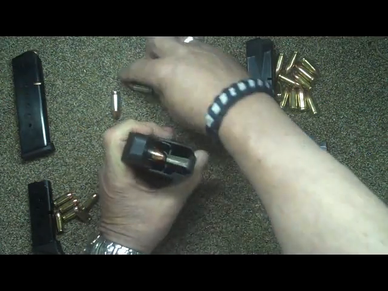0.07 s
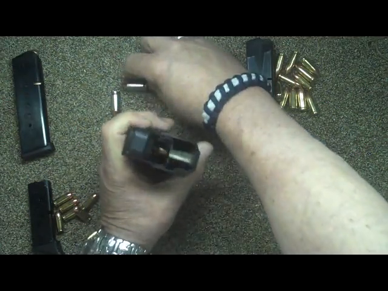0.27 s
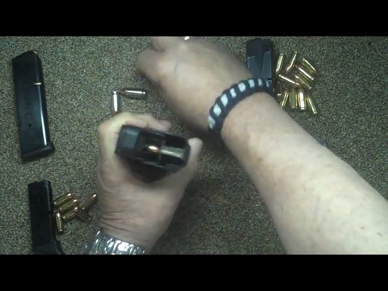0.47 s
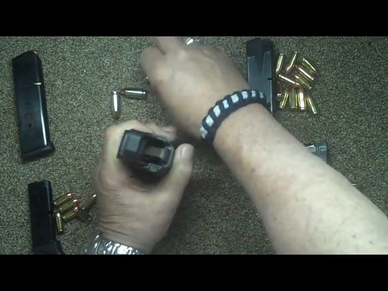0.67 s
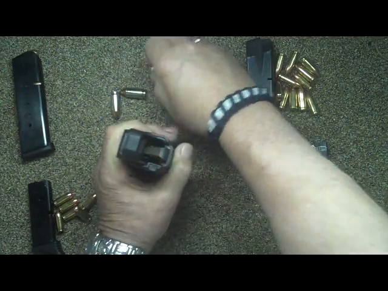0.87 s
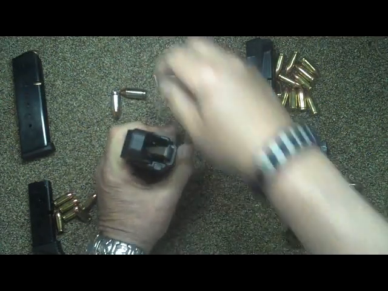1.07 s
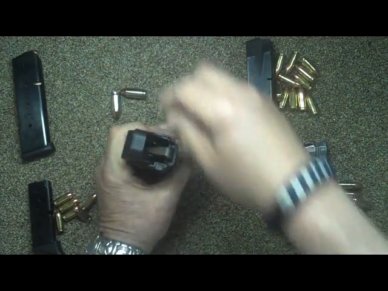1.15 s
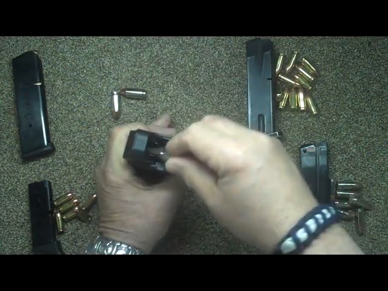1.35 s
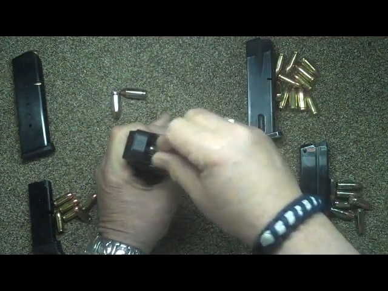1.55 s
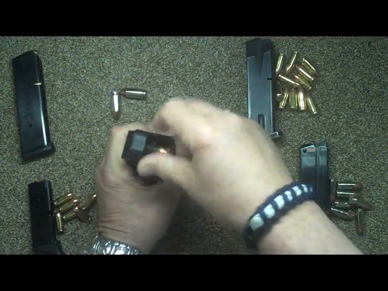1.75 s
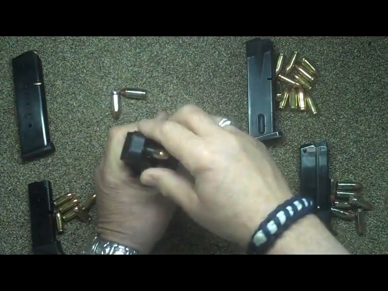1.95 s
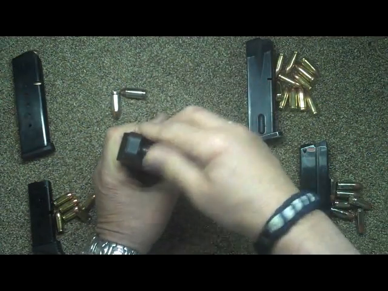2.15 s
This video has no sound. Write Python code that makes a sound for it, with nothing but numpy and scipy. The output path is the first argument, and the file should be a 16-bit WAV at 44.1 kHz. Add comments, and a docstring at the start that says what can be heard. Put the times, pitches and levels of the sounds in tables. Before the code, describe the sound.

Cartridges pressed into a steel magazine with bright snaps and short metallic ring; a plastic loader scrapes and rattles midway, another cluster of snaps follows, then faint handling over quiet background hiss in a small room.

```python
"""Loading a pistol magazine

A plastic loader snaps down, a cartridge slides home and the loader rasps back up the magazine.
The next cartridge clatters against the steel lips and is pressed in with two snaps.
Clicks are noise bursts with a modal steel ring; slide and drag are random slips over hiss.
Knocked parts are damped sine clusters and finger brushes are swelling hiss.
A small room, a thin microphone sound and quiet background noise surround it all."""
import sys
import numpy as np
from scipy import signal
from scipy.fft import rfft, irfft
from scipy.io import wavfile
from scipy.ndimage import uniform_filter1d

SR = 44100
rng = np.random.default_rng(int(sys.argv[2]) if len(sys.argv) > 2 else 0)


def bounce(signal):
    """Save signal as a 16-bit WAV file at the path given by the first command-line argument."""
    frames = np.transpose(np.atleast_2d(signal))
    limited = np.clip(frames, -1, 1)
    pcm = np.round(limited * 32767).astype(np.int16)
    wavfile.write(sys.argv[1], SR, pcm)


N = 97020  # length in samples, 2.2 s


def amp(db):
    """Decibels to gain."""
    return 10 ** (np.asarray(db) / 20)


def unit(x):
    """Scales to an rms of one."""
    return x / np.sqrt(np.mean(x ** 2) + 1e-20)


def add(mix, s, sound):
    """Mixes a sound in, starting at s seconds."""
    part = mix[max(0, round(s * SR)):][:len(sound)]
    part += sound[:len(part)]


def read(points, hz):
    """Reads a curve of (Hz, value) points on a log-frequency axis."""
    f, value = np.transpose(points)
    return np.interp(np.log(hz + 1), np.log(f + 1), value)


def colour(x, points, size=2048):
    """Causal minimum-phase filter with the given spectrum in dB."""
    hz = abs(np.fft.fftfreq(size, 1 / SR))
    log_gain = np.log(amp(read(points, hz)))
    spectrum = np.exp(np.conj(signal.hilbert(log_gain)))
    taps = np.fft.ifft(spectrum).real
    return signal.fftconvolve(x, taps)[:len(x)]


def fade(t, t60):
    """Exponential decay that falls by 60 dB in t60 seconds."""
    return np.exp(-np.log(1000) * t / t60)


def level(curve, axis=1):
    """Gain at every sample from one dB column of a curve."""
    columns = np.transpose(curve)
    return amp(np.interp(np.arange(N) / SR, columns[0], columns[axis]))


def dense(n):
    """Noise with an even spectrum: countless overlapping modes in random phase."""
    phase = 2 * np.pi * rng.random(n // 2 + 1)
    return unit(irfft(np.exp(1j * phase), n))


def uneven(n, depth_db, s):
    """A random gain that glides to a new value every s seconds."""
    knots = np.clip(rng.standard_normal(N // 4), -2, 2)
    wander = np.interp(np.arange(n) / SR / s, np.arange(len(knots)), knots)
    return unit(amp(depth_db * wander))


def balanced(x, order=140):
    """Evens out the broad tilt and humps of a noise burst and keeps its fine resonances."""
    power = uniform_filter1d(abs(rfft(x)) ** 2, order)
    inverse_db = -10 * np.log10(power + 1e-12)
    return colour(x, np.c_[np.fft.rfftfreq(len(x), 1 / SR), inverse_db])


def friction(slips_per_s, spread_db, hiss_db):
    """Tiny random slips of uneven size over a smooth hiss."""
    happens = rng.random(N) < slips_per_s / SR
    size = amp(spread_db * np.minimum(rng.exponential(1, N), 3))
    slips = happens * rng.choice([-1, 1], N) * size
    return unit(slips) + amp(hiss_db) * dense(N)


# Ring of the steel magazine. Each row: mode in Hz, relative level in dB, 60 dB decay in seconds.
MAGAZINE_MODES = [(1373, -5.5, 0.029), (1617, -6, 0.057), (1885, -4, 0.061), (2077, 0.5, 0.044),
                  (2125, -5, 0.029), (2450, -12.5, 0.053), (2792, -20, 0.053), (2987, -7, 0.024),
                  (3138, -5, 0.047), (3634, -8.5, 0.022), (6404, -7, 0.049), (6920, -6, 0.033)]


def magazine(t):
    """The steel rings as a sum of decaying modes after one blow."""
    ring = np.zeros(len(t))
    for hz, db, t60 in MAGAZINE_MODES:
        ring += amp(db) * fade(t, t60) * np.sin(2 * np.pi * (hz * t + rng.random()))
    return ring


def rubbed_magazine(rub):
    """Every slip of the rubbing sets the magazine's modes ringing."""
    return unit(signal.fftconvolve(rub, magazine(np.arange(SR // 4) / SR))[:N])


# Cartridge sliding on steel. Each row: time in seconds, level in dB before body and room.
SLIDE_LEVEL = [(0, -55), (.11, -61), (.15, -65), (.225, -57.5), (.26, -41.5), (.35, -60.5), (.42, -64),
               (.60, -60.5), (.62, -49.5), (.688, -51.5), (.73, -70), (1.42, -66.5), (1.435, -55.5),
               (1.505, -49), (1.59, -67), (1.635, -45.5), (1.655, -71), (1.68, -48), (1.80, -66),
               (2.2, -71)]
# Tone of brass on steel. Each row: frequency in Hz, relative level in dB.
SLIDE_COLOUR = [(100, -29), (600, -16), (1300, -13), (2000, 2), (3000, -2.5), (4200, -8), (6800, -7),
                (8500, -14.5), (10000, -14), (12000, -32.5), (14000, -78)]


def slide():
    """Brass rubs along the steel in small slips and sets the magazine ringing faintly."""
    rub = friction(slips_per_s=1800, spread_db=3.5, hiss_db=1.0)
    scrape = unit(colour(rub, SLIDE_COLOUR))
    return level(SLIDE_LEVEL) * unit(scrape + amp(-31.0) * rubbed_magazine(rub))


# Snaps and clicks of loader, cartridge and magazine. Each row: start in seconds, bass, middle, treble
# and top in relative dB, rise in seconds, 60 dB decay of the crack in seconds, magazine ring in relative dB.
CLICKS = [ (0.0724, -50.5, -42, -48.5, -88, 0.0014, 0.053, -7),
          (0.1877, -58, -41.5, -56, -81, 0.0036, 0.048, 1.5),
          (0.2339, -82, -50.5, -36.5, -42.5, 0.00031, 0.03, 1.5),
          (0.2623, -52.5, -25.5, -24.5, -28.5, 0.0023, 0.02, -1),
          (.2690, -45, -29.5, -30, -41.5, 0.00055, 0.036, 1.5),
          (.2800, -71, -29, -55, -65, 0.00059, 0.052, -8),
          (0.2927, -43.5, -45.5, -37.5, -50, 0.00065, 0.032, 0.5),
          (.3110, -69, -66, -29, -46, 0.00024, 0.0055, -12), (.3182, -88, -55, -41, -54, .0004, 0.063, 3),
          (.5350, -51.5, -30.5, -45, -55, 0.0054, 0.046, -19),
          (0.5581, -49.5, -35, -42.5, -65, 0.0037, 0.033, -9.5),
          (0.609, -72, -43, -66, -55.5, 0.0024, 0.089, 1), (0.689, -52, -40, -33.5, -34, 0.0003, 0.04, -3),
          (0.822, -50, -50.5, -58, -75, 0.0039, 0.033, 0), (1, -54, -53, -70, -53.5, 0.0013, 0.055, 4.5),
          (1.095, -34, -64, -59, -31, 0.0034, 0.0096, 18),
          (1.1907, -42, -33.5, -29, -37, 0.0052, 0.027, -15),
          (1.4253, -49.5, -39, -41, -61.5, 0.0019, 0.074, -9),
          (1.4766, -39, -21, -32.5, -34.5, 0.0013, 0.029, -4),
          (1.5103, -43, -27.5, -36, -40.5, 0.0019, 0.086, -4.5),
          (1.5255, -51.5, -43, -25.5, -34.5, 0.0006, 0.036, -6.5),
          (1.5464, -43, -37.5, -34.5, -45, 0.0021, 0.046, -4), (1.609, -58, -54, -44, -47, 0.01, 0.048, 6),
          (1.628, -56, -52, -43, -46.5, 0.0064, 0.046, 9),
          (1.6864, -38.5, -32.5, -31.5, -39, 0.0014, 0.05, -5),
          (1.725, -43, -27, -28, -38.5, 0.0014, 0.058, -7), (1.898, -54, -45, -46, -51, 0.012, 0.093, 2.5),
          (2.033, -66, -48, -53.5, -82, 0.006, 0.034, -19)]
# Where the bass, middle, treble and top of a click sit, in Hz.
CLICK_BAND_HZ = [500, 2600, 5700, 9200]
# Tone shared by all clicks. Each row: frequency in Hz, gain in dB.
CLICK_COLOUR = [(40, -3), (170, 6.5), (550, 10.5), (850, 5), (2000, 7.5), (3200, 11.5), (5000, 9),
                (7000, 9.5), (9200, 9.5), (10500, 4), (12000, -5), (14000, -8)]
CLICK_DB, RING_DB = -0.5, -6.5  # trims for all clicks and for the ring inside them
CHATTER_DB, CHATTER_S = 2.5, 0.00092  # parts chatter while they meet


def clicks(size=12288):
    """Each blow is a short noisy crack plus the magazine's ring, coloured by where it lands."""
    out, t = np.zeros(N), np.arange(size) / SR
    for s, *bands_db, rise, t60, ring_db in CLICKS:
        attack = np.minimum(t / max(rise, 1 / SR), 1)
        shape = attack * fade(t, t60)
        burst = dense(size) * uneven(size, CHATTER_DB, CHATTER_S) * shape
        crack = balanced(burst) * np.linalg.norm(shape)  # restores the energy of the shape
        ring = amp(RING_DB + ring_db) * attack * magazine(t)
        add(out, s, colour(crack + ring, list(zip(CLICK_BAND_HZ, bands_db))))
    return amp(CLICK_DB) * colour(out, CLICK_COLOUR)


# Tones of single knocked parts, brass cases high and loader low. Each row: start in seconds,
# pitch in Hz, level in dB before the room, rise in seconds, time until damped by 60 dB in seconds.
PINGS = [(.270, 2025, -33.5, 0.002, 0.067), (.6895, 8300, -26.5, 0.00052, 0.012),
         (.690, 150, -44, 0.0047, 0.019), (0.826, 3075, -48.5, 0.0027, 0.023),
         (1, 3104, -45, 0.0024, 0.051), (1.024, 303, -48.5, 0.0065, 0.042), (1.090, 507, -40, 0.014, 0.053),
         (1.112, 2040, -42, 0.0046, 0.055), (1.146, 375, -55, 0.0041, 0.044),
         (1.1925, 6910, -25.5, 0.0041, 0.011), (1.196, 1651, -45.5, 0.002, 0.089),
         (1.229, 1640, -44.5, 0.0043, 0.058), (1.4774, 1060, -38.5, 0.0013, 0.02),
         (1.477, 3080, -24.5, 0.0016, 0.014), (1.610, 2053, -42, 0.0032, 0.055),
         (1.5246, 4890, -26, 0.00086, 0.017), (1.547, 4940, -29, 0.00084, 0.021),
         (1.686, 5090, -30, .001, 0.011), (1.893, 310, -49, 0.008, 0.026), (1.917, 392, -60, 0.0038, 0.069),
         (1.917, 1621, -44, 0.0035, 0.057), (2.034, 1625, -42.5, 0.0077, 0.029)]
PING_SPLIT = 0.023  # smallest relative offset of the neighbouring modes of a part not quite round
PING_SIDE_DB = -12  # each neighbour against the main mode


def pings():
    """A knocked part sounds a tight cluster of modes; the fingers damp it more and more firmly."""
    out, t = np.zeros(N), np.arange(SR // 2) / SR
    for s, hz, db, rise, length in PINGS:
        cluster = np.sin(2 * np.pi * hz * t)
        for way in (-1, 1):
            side_hz = hz * (1 + way * PING_SPLIT * rng.uniform(1.0, 1.49))
            cluster += amp(PING_SIDE_DB) * np.sin(2 * np.pi * (side_hz * t + rng.random()))
        # squared time makes the decay steepen
        shape = np.minimum(t / rise, 1) * fade(t ** 2 / length, length)
        add(out, s, amp(db) * shape * cluster)
    return out


# Loader dragged along the magazine. Each row: time in seconds, rasp and hollow rumble in relative dB.
DRAG_LEVELS = [(.86, -99, -76), (.99, -57, -68), (1.015, -41.5, -48), (1.032, -32.5, -46),
               (1.065, -40.5, -48), (1.083, -51, -48.5), (1.10, -35.5, -40.5), (1.125, -47.5, -57.5),
               (1.14, -49, -49), (1.18, -50, -59), (1.195, -34, -43), (1.22, -48, -59), (1.27, -52, -62),
               (1.35, -58, -72), (1.43, -77, -89)]
# Tone of the rasp. Each row: frequency in Hz, relative level in dB.
RASP_COLOUR = [(300, -3.5), (850, -29.5), (1100, 1), (1650, 1), (2400, 3), (3300, 6), (4400, 1), (5500, -5),
               (7200, -0.5), (8500, -9), (11000, -12.5), (13500, -32)]
# Tone of the hollow shell. Each row: frequency in Hz, relative level in dB.
RUMBLE_COLOUR = [(40, -67), (110, -5), (170, -9.5), (380, -7.5), (520, -0.5), (700, -7.5), (2000, -35.5)]


def drag():
    """The loader rasps along the magazine in tiny slips and its hollow shell rumbles."""
    rub = friction(slips_per_s=900, spread_db=3.0, hiss_db=4)
    scrape = unit(colour(rub, RASP_COLOUR))
    rasp = unit(scrape + amp(-14) * rubbed_magazine(rub))
    rumble = unit(colour(rub, RUMBLE_COLOUR))
    return amp(-3.5) * (level(DRAG_LEVELS) * rasp + level(DRAG_LEVELS, axis=2) * rumble)


# Fingers brushing over the loader. Each row: start in seconds, length in seconds,
# level in dB at the top of the swell before the room.
BRUSHES = [(1.754, 0.091, -61.5), (2.061, 0.025, -58.5), (2.139, 0.084, -63)]
# Tone of skin on plastic. Each row: frequency in Hz, relative level in dB.
BRUSH_COLOUR = [(1200, -45.5), (3000, -14), (7000, -6), (14000, -21)]


def brushes():
    """Skin on plastic: a soft hiss that swells and fades."""
    out = np.zeros(N)
    for s, length, db in BRUSHES:
        swell = np.sin(np.linspace(0, np.pi, round(length * SR)))
        hiss = unit(colour(dense(N), BRUSH_COLOUR))[:len(swell)]
        add(out, s, amp(db) * swell * hiss)
    return out


# Resonances and hollows of the magazine and loader held in the hand.
# Each row: centre in Hz, boost or cut in dB.
BODY = [(516, 2.5), (930, -3), (1065, 3.5), (1770, -1.5), (2060, 0.5)]
BODY_WIDTH_HZ = 102  # from the centre to where the dB bump falls to 1/e


def body(x):
    """Clicks, slide and drag all pass through the resonances of the same hollow body."""
    hz = np.fft.rfftfreq(2048, 1 / SR)
    gain_db = sum(db * np.exp(-((hz - centre) / BODY_WIDTH_HZ) ** 2) for centre, db in BODY)
    return colour(x, np.c_[hz, gain_db])


# Nearby surfaces. Each row: delay in seconds, level in dB against the direct sound.
ECHOES = [(.00577, -13), (0.0101, -16)]
# Tail of the room. Each row: band centre in Hz, relative level in dB, 60 dB decay in seconds.
ROOM = [(246, -13, 0.2), (1020, -13.5, 0.14), (3060, -18.5, 0.13), (6430, -20, 0.1), (11900, -47, .22)]


def room(x):
    """Direct sound, a few close reflections and a faint tail that decays band by band."""
    t = np.arange(SR // 2) / SR
    hz, noise = np.fft.rfftfreq(len(t), 1 / SR), rfft(dense(len(t)))
    centres = [row[0] for row in ROOM]
    response = np.zeros(len(t))
    for share, (_, db, t60) in zip(np.eye(len(ROOM)), ROOM):
        # neighbouring bands crossfade
        band = irfft(noise * read(list(zip(centres, share)), hz), len(t))
        envelope = fade(t, t60) * np.minimum(t / 0.063, 1)  # the tail builds up over 63 ms
        response += amp(db) * band * envelope / np.linalg.norm(envelope)
    response[0] += 1  # direct sound
    for s, db in ECHOES:
        add(response, s, amp([db]))
    return signal.fftconvolve(x, response)[:N]


# Tone of the background noise. Each row: frequency in Hz, relative level in dB.
FLOOR_COLOUR = [(25, 9), (60, -3), (150, -3.5), (400, -7), (900, -7), (2000, -11), (3000, -6),
                (4500, -18.5), (7000, -23), (14000, -24.5)]
FLOOR_DB = -65.5  # rms before the band limit
LOW_CUT_HZ = 185  # the small microphone hears little bass


def scene():
    """All the handling sounds in the room, heard through a small microphone over quiet noise."""
    handling = room(body(slide() + clicks() + drag()) + pings() + brushes())
    low_cut = signal.butter(2, LOW_CUT_HZ, "highpass", fs=SR, output="sos")
    heard = signal.sosfilt(low_cut, handling)
    floor = amp(FLOOR_DB) * unit(colour(dense(N), FLOOR_COLOUR))
    return (heard + floor)[None]


EDGE_HZ = 14000  # upper band edge


def record(dry):
    """The recorder's band limit: a steep linear-phase low-pass."""
    taps = signal.firwin(255, EDGE_HZ, window=("kaiser", 8), fs=SR)
    return signal.oaconvolve(dry, taps[None], "same")


dry = scene()
out = record(dry)
bounce(out)
```